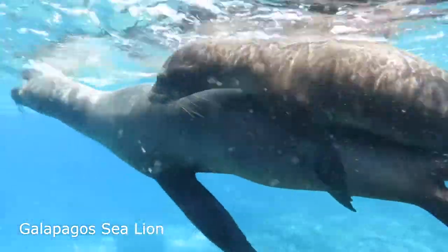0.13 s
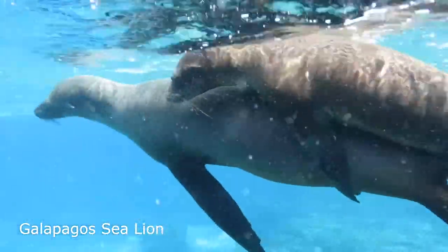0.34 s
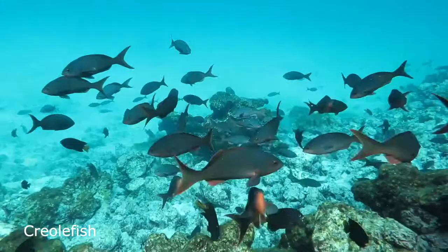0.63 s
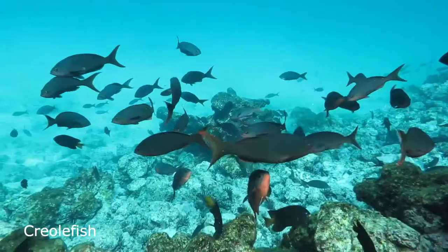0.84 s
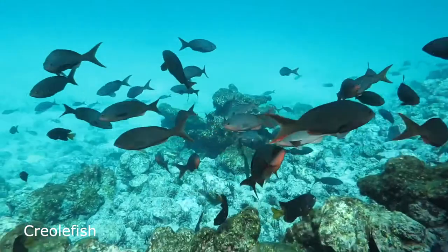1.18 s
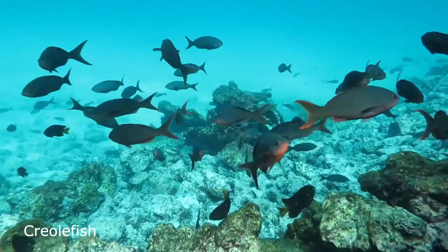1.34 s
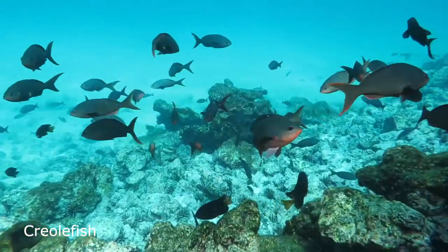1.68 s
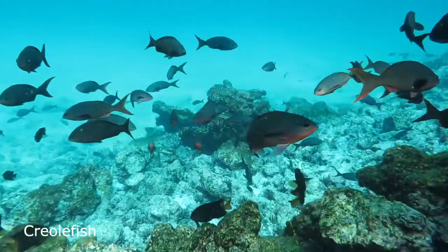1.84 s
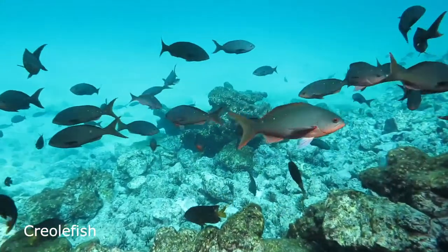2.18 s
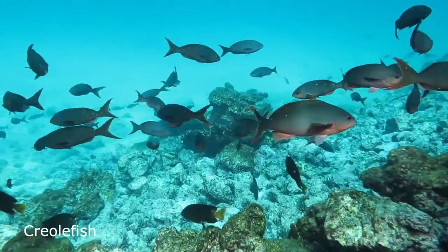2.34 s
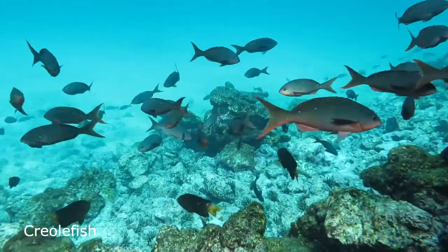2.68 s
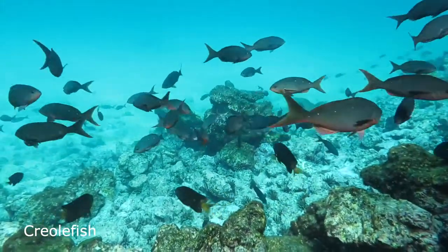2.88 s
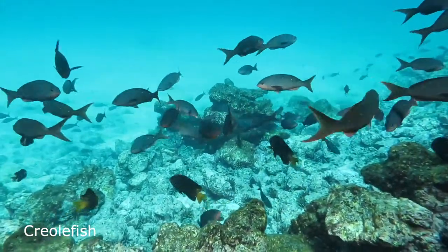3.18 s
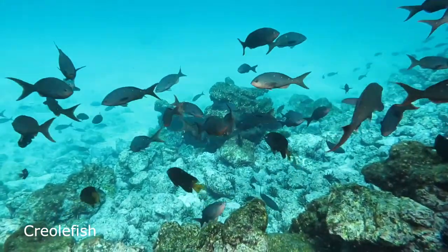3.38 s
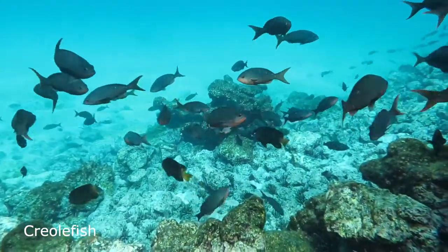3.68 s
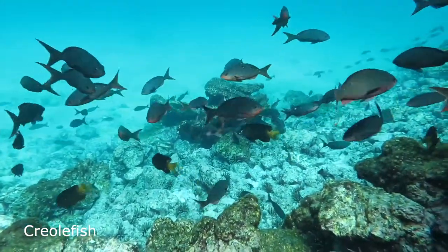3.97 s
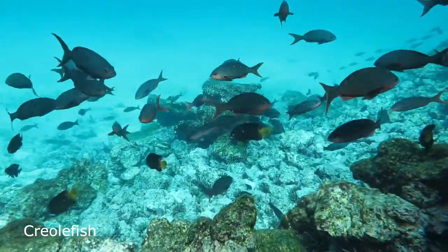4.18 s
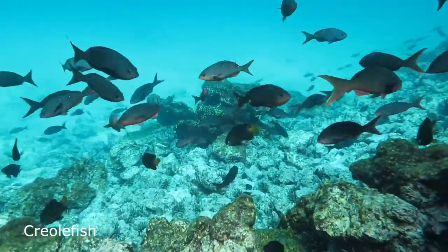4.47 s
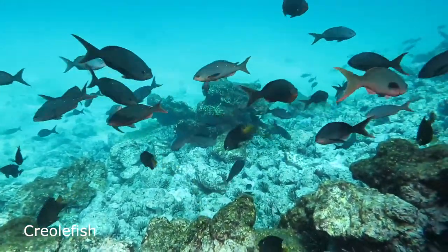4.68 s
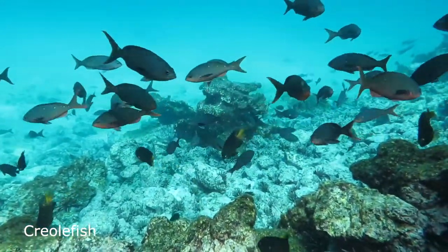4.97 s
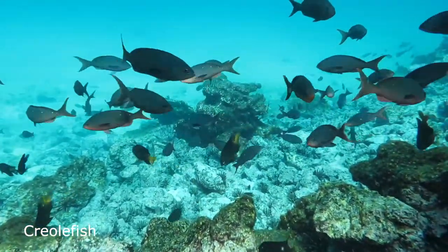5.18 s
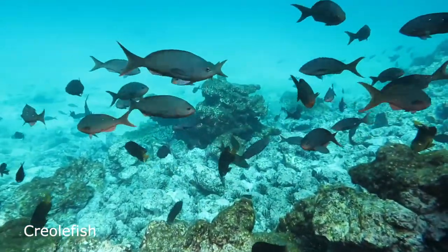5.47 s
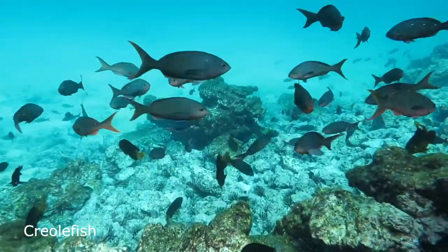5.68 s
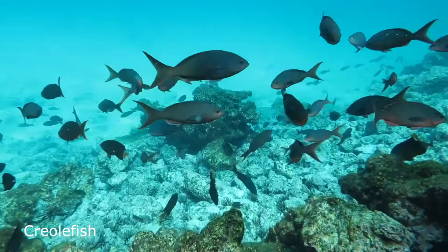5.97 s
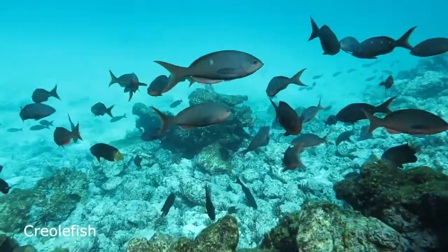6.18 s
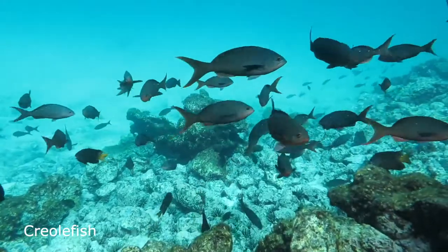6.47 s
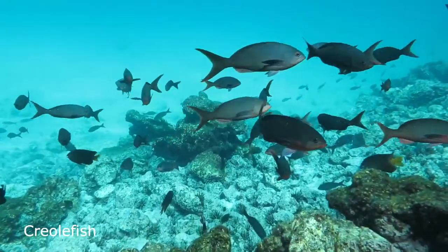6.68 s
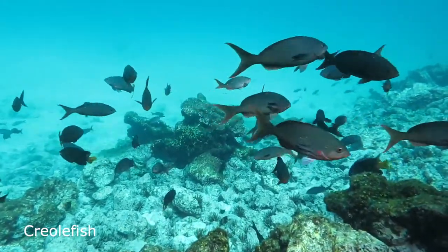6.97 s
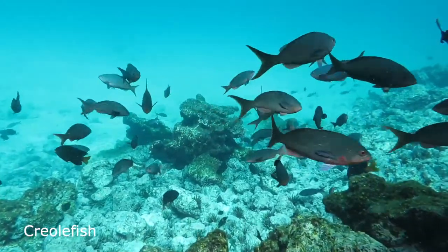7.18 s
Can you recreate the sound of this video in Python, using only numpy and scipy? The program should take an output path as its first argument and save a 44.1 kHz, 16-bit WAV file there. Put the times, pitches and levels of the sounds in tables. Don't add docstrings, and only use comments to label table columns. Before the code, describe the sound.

Close, boxy underwater sound from a microphone within a small housing: dull rumble and cavity boom with soft hiss. Quick low motor ticks begin at once, stop, and return in several fluttering bouts. Dry shrimp snaps and fine crackles scatter in stereo, a few much louder. Soft grip thuds pass beneath. Near the end a heavy knock hits the shell, then a smaller hollow tap.

```python
import sys
import numpy as np
from scipy import signal
from scipy.fft import rfft, irfft, next_fast_len
from scipy.io import wavfile
from scipy.ndimage import map_coordinates

SR = 44100
rng = np.random.default_rng(int(sys.argv[2]) if len(sys.argv) > 2 else 0)


def put_to_file(sound):
    columns = np.atleast_2d(sound).T
    safe = np.clip(columns, -1, 1)
    whole_steps = np.round(safe * 32767)
    wavfile.write(sys.argv[1], SR, whole_steps.astype(np.int16))


def magnitude_from_level(level_db):
    exponent = np.asarray(level_db, float) / 20
    return 10 ** exponent


N = 323683

# t/s, low wall mode level/dB,
# middle level/dB, upper and twisting level/dB, bright level/dB, crack level/dB
SNAPS = [(0.1378, -63, -50, -54, -58, -49), (0.199, -47, -57, -53, -44, -46),
         (0.2354, -44.5, -44.5, -42.5, -46, -52), (0.2418, -51, -54, -57, -48, -43),
         (0.2962, -53, -49, -39.5, -51, -48.5), (0.305, -57, -47, -40.5, -42, -40),
         (0.423, -42.5, -55, -45, -52, -54), (0.5185, -50, -52, -42, -46.5, -49),
         (0.6693, -70, -61, -58, -51, -43.5), (0.7731, -56, -69, -58, -56, -48),
         (0.847, -64, -65, -54, -51, -46), (0.8988, -42.5, -52, -42.5, -58, -51),
         (1.0076, -52, -49, -48, -46, -40.5), (1.1837, -70, -70, -70, -70, -49),
         (1.214, -64, -70, -70, -60, -56), (1.226, -55, -52, -48, -44, -44),
         (1.241, -45, -46, -34.5, -38.5, -42), (1.3638, -63, -64, -47.5, -48, -48),
         (1.4381, -39.5, -41, -30.5, -47, -43), (1.5289, -32.5, -50, -22, -30.5, -24),
         (1.571, -59, -70, -70, -59, -45.5), (1.7194, -59, -68, -70, -70, -50),
         (1.7503, -49, -49, -49, -56, -51), (1.779, -51, -65, -47, -51, -52),
         (1.8415, -62, -58, -41.5, -44, -53), (1.905, -58, -69, -56, -51, -45),
         (1.9206, -51, -51, -58, -58, -48), (1.933, -67, -66, -57, -62, -41.5),
         (1.949, -70, -58, -57, -48, -39), (1.9825, -51, -46, -44, -40, -49),
         (2.015, -58, -51, -45, -43, -39), (2.196, -53, -59, -36, -48, -38),
         (2.2184, -58, -62, -46, -48, -51), (2.2293, -49, -64, -57, -70, -48),
         (2.2825, -52, -49, -37, -44, -47), (2.4261, -46.5, -42.5, -35, -38, -46),
         (2.547, -70, -70, -63, -48, -40), (2.6492, -70, -67, -70, -64, -50),
         (2.852, -51, -61, -51, -53, -47), (2.901, -61, -68, -63, -69, -48.5),
         (2.9725, -50, -50, -49, -40.5, -34), (3.0216, -70, -70, -64, -58, -51),
         (3.0852, -62, -51, -45, -47, -49), (3.1324, -27, -29.5, -18.5, -38, -25.5),
         (3.2486, -59, -70, -60, -65, -44.5), (3.2897, -47, -48, -42, -50, -46),
         (3.39, -35, -38, -22.5, -26.5, -31), (3.425, -43, -45, -37, -40, -35.5),
         (3.7612, -64, -67, -53, -51, -39), (3.8282, -46.5, -58, -54, -51, -47),
         (3.908, -67, -66, -55, -50, -48), (3.9745, -54, -70, -61, -55, -44.5),
         (4.0851, -56, -65, -46.5, -37, -35.5), (4.2655, -50, -44.5, -48, -65, -58),
         (4.332, -54, -55, -33.5, -46, -43.5), (4.367, -63, -70, -57, -52, -45),
         (4.38, -70, -49, -44, -40, -44), (4.4524, -37.5, -31, -29.5, -41, -35),
         (4.554, -66, -67, -59, -47, -43.5), (4.576, -52, -65, -46.5, -54, -54),
         (4.8236, -47, -49, -43, -48, -37), (4.828, -36.5, -33.5, -28, -28.5, -36),
         (4.8387, -70, -66, -58, -60, -53), (4.923, -67, -56, -49, -50, -57),
         (4.9343, -32, -36, -23.5, -33.5, -33.5), (5.0368, -62, -70, -49, -48, -47),
         (5.1246, -54, -54, -45, -69, -46), (5.167, -72, -61, -70, -70, -51),
         (5.1876, -70, -61, -55, -70, -55), (5.2265, -60, -58, -49, -55, -48),
         (5.3182, -47, -45, -44, -54, -52), (5.3793, -49, -42.5, -37.5, -32.5, -41),
         (5.3877, -70, -55, -51, -43, -33), (5.4447, -55, -56, -53, -46, -47),
         (5.4807, -58, -64, -61, -46, -40), (5.5928, -62, -52, -46.5, -58, -70),
         (5.7403, -61, -50, -52, -63, -70), (5.9954, -56, -65, -47.5, -48, -52.5),
         (6.1175, -63, -70, -65, -67, -74), (6.1345, -49, -51, -33.5, -71, -65),
         (6.3094, -57, -56, -48.5, -51, -40), (6.442, -70, -67, -63, -59, -55),
         (6.4548, -67, -50, -48, -49, -40.5), (6.6347, -24.5, -26.5, -30, -39, -51),
         (6.6964, -69, -61, -69, -65, -47), (6.7832, -66, -70, -66, -58, -46),
         (6.8409, -60, -43, -42, -41, -34), (6.8825, -34, -34, -31, -51, -73),
         (6.9202, -50, -57, -51, -63, -67), (6.9506, -24, -17.5, -35.5, -69, -45),
         (7.1293, -56, -56, -59, -68, -63), (7.25, -68, -55, -61, -59, -50),
         (7.3213, -45, -70, -70, -68, -75)]
# t/s, peak level/dB
MOTOR_STEPS = [(0.011, -37), (0.047, -35.5), (0.083, -42), (0.119, -41), (0.153, -45), (0.181, -36.5),
               (0.212, -37), (0.247, -38), (1.036, -36), (1.073, -37), (1.101, -41), (1.137, -38),
               (1.172, -37), (1.206, -37), (1.242, -38), (1.27, -38), (1.297, -44), (1.331, -37),
               (1.364, -36), (1.407, -34), (1.439, -36), (1.468, -35), (1.496, -45), (1.532, -38),
               (1.564, -39), (1.598, -41), (1.635, -39), (1.672, -38), (1.697, -40), (1.732, -35),
               (1.768, -34), (1.803, -35), (1.84, -34), (1.871, -34.5), (1.896, -40), (1.932, -35),
               (1.97, -43.5), (2.463, -48), (2.966, -35), (3.002, -40), (3.034, -34.5), (3.067, -41),
               (3.101, -38), (3.137, -43), (3.165, -36.5), (3.199, -35), (3.239, -36), (3.274, -34),
               (3.3, -35.5), (3.339, -32), (3.374, -34), (3.399, -45), (3.441, -35), (3.466, -34),
               (3.505, -33), (3.571, -36.5), (3.61, -35.5), (5.068, -38), (5.109, -36.5), (5.141, -34.5),
               (5.168, -34), (5.201, -36), (5.24, -35.5), (5.276, -35), (5.309, -33.5), (5.34, -37),
               (5.371, -33), (5.404, -36.5), (5.44, -41), (5.475, -36), (5.627, -49), (6.304, -35.5),
               (6.348, -33), (6.378, -35.5), (6.41, -37), (6.444, -35), (6.476, -35.5), (6.504, -35.5),
               (6.541, -39), (6.577, -39), (6.603, -40), (6.68, -40), (6.711, -40), (6.751, -40),
               (6.786, -38), (6.829, -35.5), (6.855, -34), (6.902, -37), (6.961, -49), (7.105, -45),
               (7.137, -35), (7.171, -34), (7.213, -34), (7.243, -33), (7.28, -34), (7.31, -32.5),
               (7.335, -32)]
# t/s, level/dB, push direction/1, contact time/s, cavity ring level/dB, edge level/dB
KNOCKS = [
    (6.6348, -3, 0.93, 0.00222, -3, -11),
    (6.6393, -10, -0.47, 0.00178, -4, -53),
    (6.8815, -23.5, -0.78, 0.0012, 8, -47),
]
# t/s, level/dB, f/Hz
THUDS = [
    (0.03, -45, 43),
    (2.202, -50, 49.7),
    (2.383, -49, 49.7),
    (2.47, -46.5, 55),
    (4.64, -51, 35),
    (5.63, -44, 55),
    (5.69, -53, 50),
    (6.99, -54, 45),
    (7.105, -50, 55.3),
    (7.33, -49, 50),
]
# t/s, rumble level/dB, cavity level/dB, hum level/dB, hiss level/dB
SURGE = [(0.0, -65, -53, -60, -63.5), (0.39, -66, -53, -60.5, -62), (0.65, -70, -53.5, -58, -64.5),
         (0.94, -71.5, -53, -60.5, -63), (1.39, -63, -48.5, -59, -63), (1.78, -67.5, -53, -58.5, -62),
         (2.04, -70, -52.5, -62, -64.5), (2.17, -66, -50, -59, -63), (2.37, -64.5, -55, -58, -63),
         (2.64, -66.5, -55, -59.5, -63), (2.86, -70.5, -55.5, -57, -64), (3.04, -65, -52.5, -56, -63.5),
         (3.23, -63.5, -55, -59, -62), (3.51, -62, -50.5, -60.5, -62.5), (3.78, -63.5, -47, -60, -64),
         (4.05, -65.5, -49, -61, -62.5), (4.42, -68, -51.5, -60.5, -65), (4.78, -73, -52.5, -59, -63),
         (4.97, -69, -55, -60.5, -64.5), (5.23, -67, -52, -59.5, -61), (5.42, -67, -52.5, -59.5, -63.5),
         (5.82, -69, -53.5, -57.5, -62.5), (6.23, -69.5, -54, -62.5, -64.5), (6.52, -64, -52.5, -58, -63),
         (6.78, -63.5, -55, -63, -66.5), (6.97, -62.5, -51.5, -59, -64), (7.34, -63, -54.5, -60, -62.5)]
# f/Hz, level/dB, t60/s
LOW_MODES = [(1290, 0, .019), (1560, -9, .011)]
# f/Hz, level/dB, t60/s
MIDDLE_MODES = [(2060, 0, .031)]
# f/Hz, level/dB, t60/s
UPPER_MODES = [(2705, 0, .023), (2330, -4, .011), (3390, -15, .016)]
# f/Hz, level/dB, t60/s
TWIST_MODES = [(2840, -9.5, 0.023), (3760, -12, 0.032), (1020, -31, .02)]
# f/Hz, level/dB, t60/s
BRIGHT_MODES = [(3400, -2, .013), (3900, -5, .007), (4300, 0, .009), (4800, -1, .008), (5350, -1, .009),
                (5900, -6, .007), (6750, -6, .008)]
# f/Hz, level/dB
CRACK_SPECTRUM = [(6000, -27), (7000, 0.5), (8400, -4), (9800, 5), (11000, 1.5), (12800, 6.5), (14000, -4),
                  (15200, -18), (16400, -35)]
# f/Hz, level/dB per Hz
RUMBLE_SPECTRUM = [(10, -16), (30, -7), (80, -6.5), (200, -7.5), (300, -10.5), (500, -77)]
# f/Hz, level/dB per Hz
HISS_SPECTRUM = [(20, -45), (200, -2), (600, -2.5), (1500, -11.5), (3000, -16.5), (5500, -20), (7500, -26),
                 (10000, -29), (13000, -30), (13600, -66), (15200, -70)]
# f/Hz, level/dB per Hz
SPREAD_SPECTRUM = [(20, -31), (100, -6), (350, 3.5), (600, -1.5), (1500, -6), (4000, -12.5), (7000, -18),
                   (12000, -25), (14000, -25), (14500, -40), (15200, -70)]
# f/Hz, width/Hz, level/dB
CAVITY_MODES = [(341.6, 101, 16), (226, 52, 3)]
# f/Hz, width/Hz, level/dB
HUM_MODES = [(1022, 95, 0)]
# f/Hz, width/Hz, level/dB
WHINES = [(11500, 60, -77), (14850, 90, -75)]


def unit(x):
    return x / np.sqrt(np.mean(x ** 2) + 1e-20)


def along(points, f_hz):
    knots_hz, level_db = np.transpose(points)
    return magnitude_from_level(np.interp(np.log(f_hz + 1), np.log(knots_hz + 1), level_db))


def filtered(x, response):
    size = next_fast_len(x.shape[-1] + 8192)
    spectrum = rfft(x, size) * response(np.fft.rfftfreq(size, 1 / SR))
    return irfft(spectrum, size)[..., :x.shape[-1]]


def resonant(x, modes):
    def response(f):
        return sum(magnitude_from_level(db) * 1j * f * width_hz / (hz * hz - f * f + 1j * f * width_hz)
                   for hz, width_hz, db in modes)
    return filtered(x, response)


def resonant_noise(noise, modes):
    return unit(resonant(resonant(noise, modes), modes))


def wobble(rate_hz):
    knots = rng.standard_normal(int(N * rate_hz / SR) + 4)
    return map_coordinates(knots, [np.arange(N) * rate_hz / SR])


def place(times_s, rows):
    at = np.round(np.asarray(times_s) * SR).astype(int)[:, None] + np.arange(rows.shape[1])
    return np.bincount(at.clip(0).ravel(), rows.ravel(), N + SR)[:N]


def wash():
    s, *levels = np.transpose(SURGE)
    rumble_db, cavity_db, hum_db, hiss_db = [np.interp(np.arange(N) / SR, s, db) for db in levels]
    noise = rng.standard_normal((8, N))

    rumble = unit(filtered(noise[0], lambda f: along(RUMBLE_SPECTRUM, f)))
    rumble *= magnitude_from_level(rumble_db + 9.5 + 2.8 * wobble(3.8))
    boom = magnitude_from_level(cavity_db + 0.5 + 1.43 * wobble(12)) * resonant_noise(noise[1], CAVITY_MODES)
    hum = magnitude_from_level(hum_db + 1.5) * resonant_noise(noise[2], HUM_MODES)
    wall_modes = [(1328, 163, 4.5), (2146, 160, -3.5), (2664, 45, -10.5), (12500, 200, -17)]
    wall_and_cavity = magnitude_from_level(-65) * unit(resonant(noise[4], wall_modes))
    wall_and_cavity += magnitude_from_level(-64.5) * resonant_noise(noise[4], [(442.5, 58, 0)])
    hiss = unit(filtered(noise[5], lambda f: along(HISS_SPECTRUM, f)))
    hiss *= magnitude_from_level(hiss_db + 4.5 + 0.8 * wobble(9))

    hum_apart = magnitude_from_level(hum_db - 3) * resonant_noise(noise[3], HUM_MODES)
    apart = unit(filtered(noise[6], lambda f: along(SPREAD_SPECTRUM, f)))
    apart *= magnitude_from_level(-54.5 + 0.37 * wobble(5))
    apart += magnitude_from_level(-87) * unit(resonant(noise[6], [(3750, 250, 3), (2950, 200, 0)]))
    whine = sum(magnitude_from_level(db) * resonant_noise(noise[7], [(hz, width_hz, 0)]) for hz, width_hz, db in WHINES)
    return np.array([rumble + boom + hum + wall_and_cavity + hiss, hum_apart + 0.53 * hum + apart + whine])


def thuds():
    s, db, hz = np.transpose(THUDS)
    t = np.arange(-3000, 3000) / SR
    phase = 6 * rng.random((len(s), 1))
    swell = np.exp(-0.5 * (t / 0.012) ** 2) * np.cos(2 * np.pi * hz[:, None] * t + phase)
    return place(s + t[0], magnitude_from_level(db)[:, None] * swell)


def knocks():
    push, blow, edge = np.zeros((3, N))
    for s, db, way, contact_s, ring_db, edge_db in KNOCKS:
        start = round(s * SR)
        contact = np.arange(round(contact_s * SR)) / (contact_s * SR)
        pulse = way * magnitude_from_level(db) * np.sin(np.pi * contact)
        push[start:][:len(pulse)] += pulse
        blow[start:][:len(pulse)] += magnitude_from_level(ring_db) * pulse
        edge[start] += magnitude_from_level(edge_db + 13)

    def bass_cut(f, cut_hz=50):
        return -f * f / (cut_hz ** 2 - f * f + 1.3j * cut_hz * f)

    cavity = resonant(blow, [(358, 25, 6.6), (452, 24, 4.3), (563, 76, 2.8)])
    crack = resonant(edge, [(2240, 890, 4), (3350, 380, -18)])
    crack = resonant(crack, [(2560, 830, 0.0084)])
    return filtered(push, bass_cut) + cavity + crack


def motor():
    s, db = np.transpose(MOTOR_STEPS)
    t = np.arange(-900, 900) / SR
    luck = rng.standard_normal((len(s), 3))
    rise_s, fall_s = 0.004, 0.0055
    shape = np.exp(-0.5 * (t / np.where(t < 0, rise_s, fall_s)) ** 2)
    shake_hz = 156 * (1 + 0.013 * luck[:, :1])
    shake = np.cos(2 * np.pi * shake_hz * t + 3 * luck[:, 1:2])
    rattle = magnitude_from_level(-19.5) * np.sin(2 * np.pi * 1310 * t + 3 * luck[:, 2:])
    return place(s + t[0], magnitude_from_level(db - 1.5)[:, None] * shape * (shake + rattle))


def ring(modes, count, attack_s, scatter_db):
    t = np.arange(1600) / SR
    out = np.zeros((count, len(t)))
    for hz, db, t60_s in modes:
        luck = rng.standard_normal((count, 3))
        phase = 2 * np.pi * hz * (1 + 0.007 * luck[:, :1]) * t + 3 * luck[:, 1:2]
        out += magnitude_from_level(db + scatter_db * luck[:, 2:] - 60 * t / t60_s) * np.sin(phase)
    out *= 1 - np.exp(-(t / attack_s) ** 2)
    return out / np.abs(signal.hilbert(out)).max(axis=1, keepdims=True)


def snap_cracks(s, crack_db):
    t = np.arange(-400, 1200) / SR
    decay_s = np.where(t < 0.001, 0.011, 0.016)
    envelope = magnitude_from_level(crack_db[:, None] - 60 * np.abs(t - 0.001) / decay_s)
    burst = rng.standard_normal((len(s), len(t))) * envelope
    tilt = magnitude_from_level(3.5 * rng.standard_normal((len(s), 1)))
    pivot_hz = 10500

    def below(f):
        return along(CRACK_SPECTRUM, f) / (1 + (f / pivot_hz) ** 12)

    def above(f):
        return along(CRACK_SPECTRUM, f) / (1 + (pivot_hz / (f + 1)) ** 12)

    return filtered(place(s + t[0], burst / tilt), below) + filtered(place(s + t[0], burst * tilt), above)


def shell(s, low_db, middle_db, upper_db, bright_db, crack_db):
    attack_s = 0.0011 + 0.00012 * np.clip(middle_db - upper_db - 4, 0, 20)[:, None]

    def rings(modes, db):
        return place(s - 0.0006, magnitude_from_level(db)[:, None] * ring(modes, len(s), attack_s, scatter_db=7.5))

    crack = snap_cracks(s, crack_db)
    leak = filtered(crack, lambda f: 1j * (0.61 + 0.16 * np.cos(f / 330)))
    alike = rings(LOW_MODES, low_db + 4.2) + rings(MIDDLE_MODES, middle_db - 1.0)
    alike += rings(UPPER_MODES, upper_db - 0.6) + rings(BRIGHT_MODES, bright_db + 1.5)
    alike += magnitude_from_level(-4.0) * leak
    opposed = rings(TWIST_MODES, upper_db - 2.0) + rings(BRIGHT_MODES, bright_db - 0.5)
    opposed += magnitude_from_level(-2.5) * crack
    return np.array([alike, opposed + 0.14 * alike])


def shrimp():
    near = shell(*np.transpose(SNAPS))
    luck = rng.random((170, 6))
    far_db = -64 - 9 * np.log10(luck[:, 1:2] + 0.028) + 9 * (luck[:, 1:] - 0.5)
    far_db = far_db + [-11.0, -7.0, 0.5, -10, -0.5]
    return near + shell(luck[:, 0] * N / SR, *far_db.T)


def scene():
    alike, opposed = wash() + shrimp()
    alike = alike + thuds() + knocks() + motor()
    return np.array([alike + opposed, alike - opposed])


def band_limit(x):
    return signal.sosfilt(signal.butter(12, 16470, fs=SR, output="sos"), x)


def record(dry):
    return band_limit(dry)


dry = scene()
out = record(dry)
put_to_file(out)
```